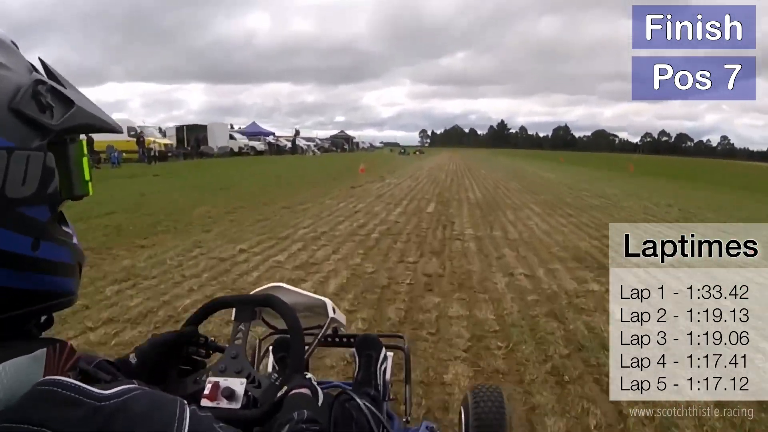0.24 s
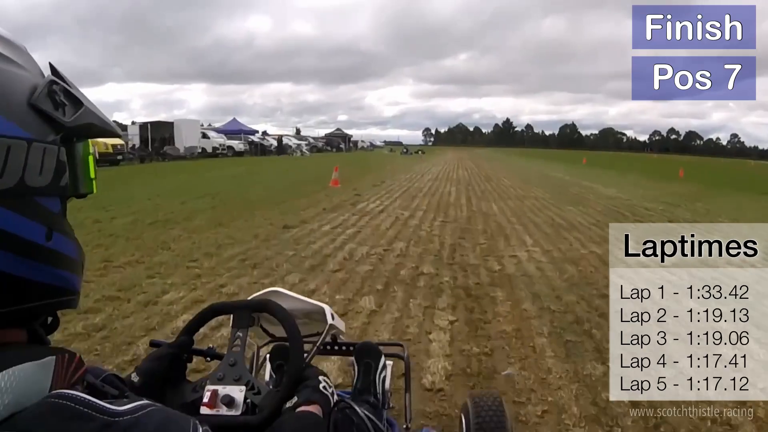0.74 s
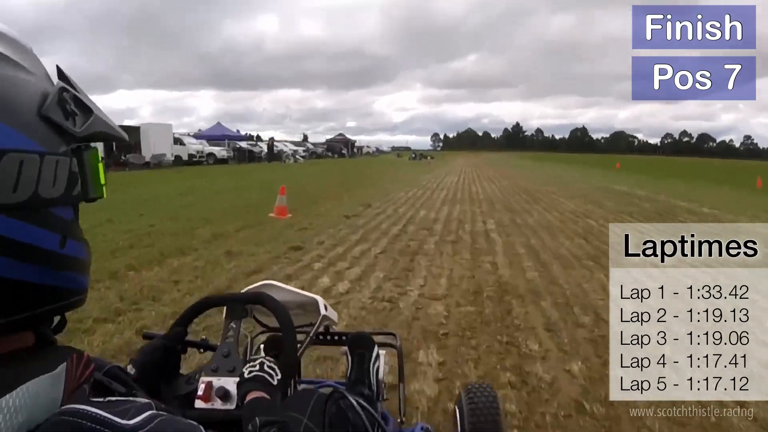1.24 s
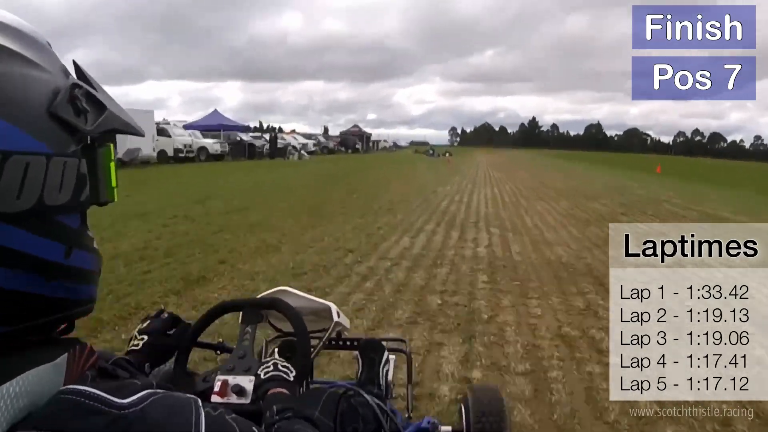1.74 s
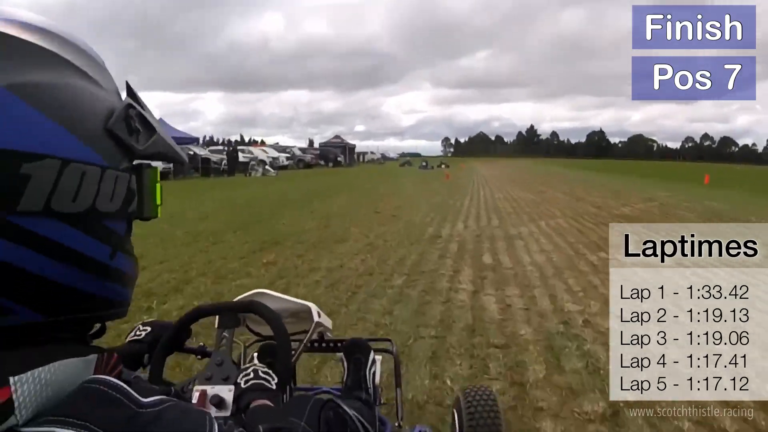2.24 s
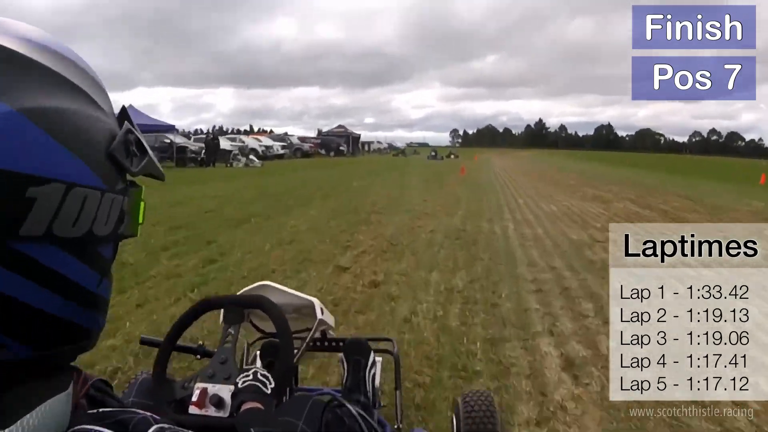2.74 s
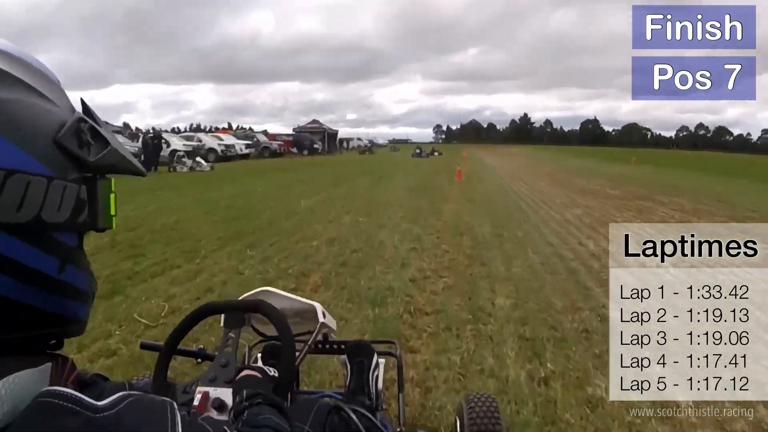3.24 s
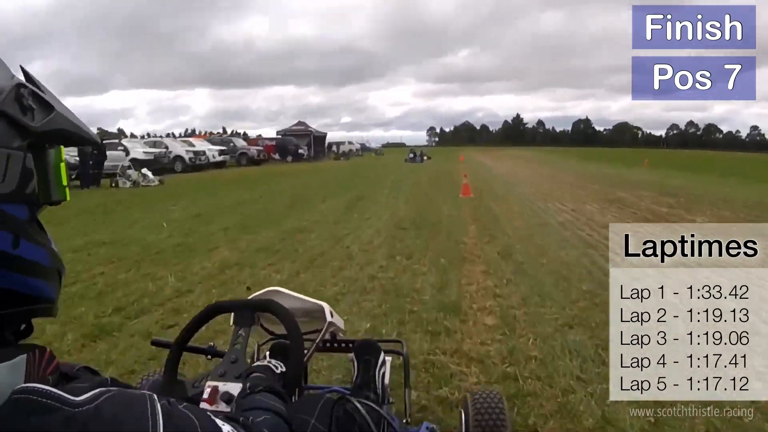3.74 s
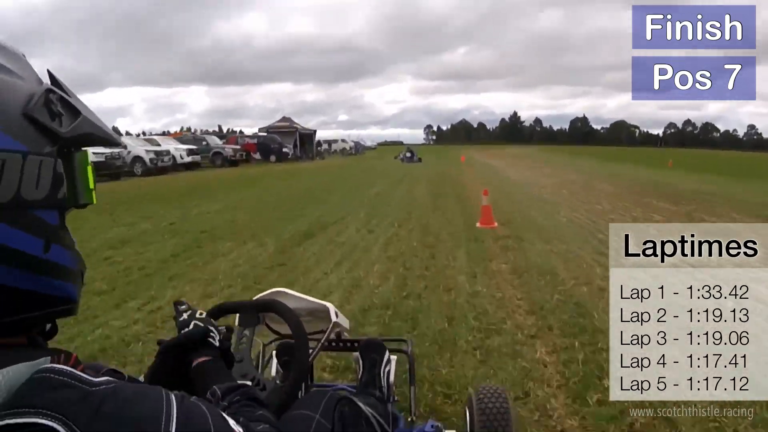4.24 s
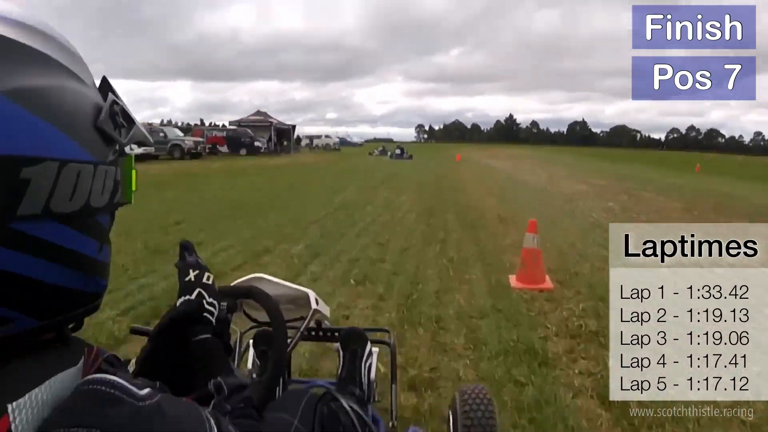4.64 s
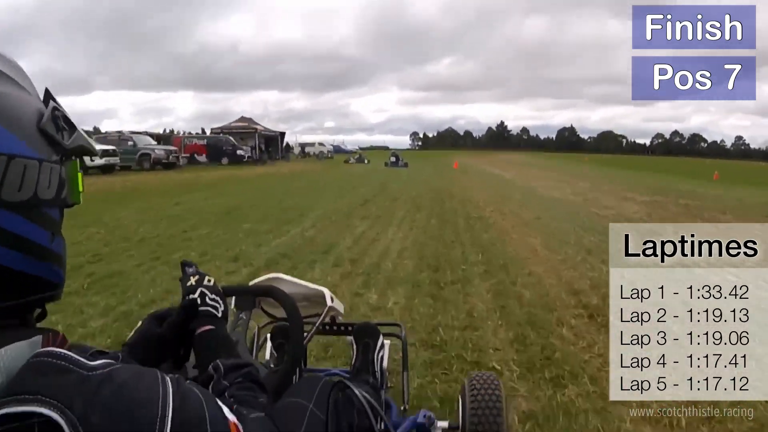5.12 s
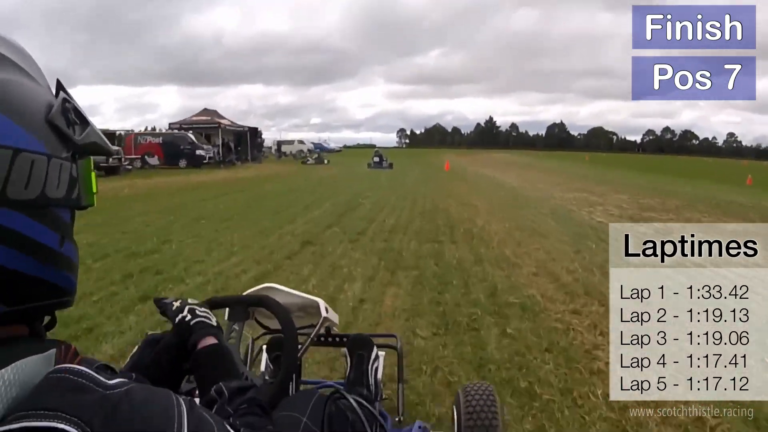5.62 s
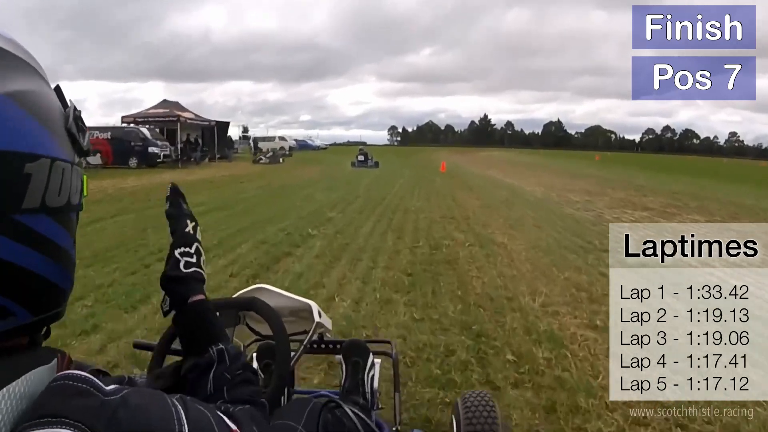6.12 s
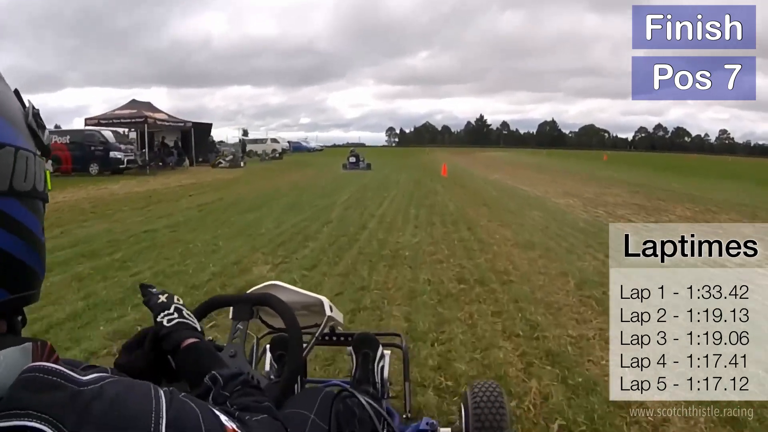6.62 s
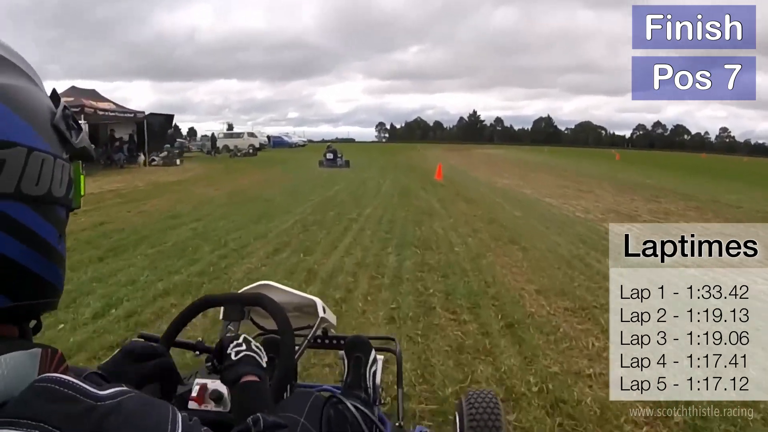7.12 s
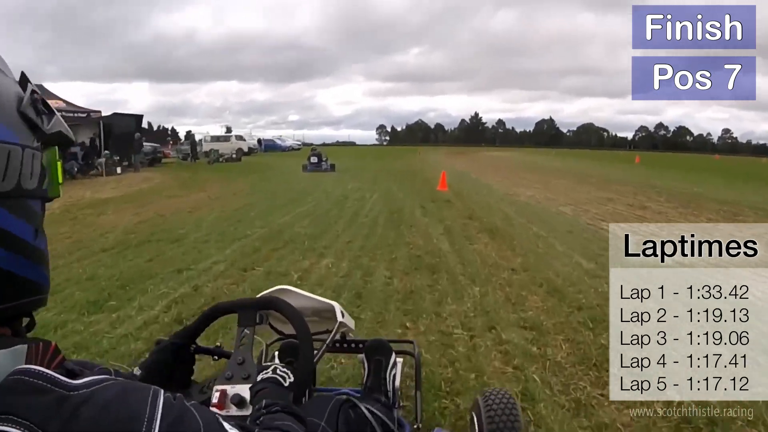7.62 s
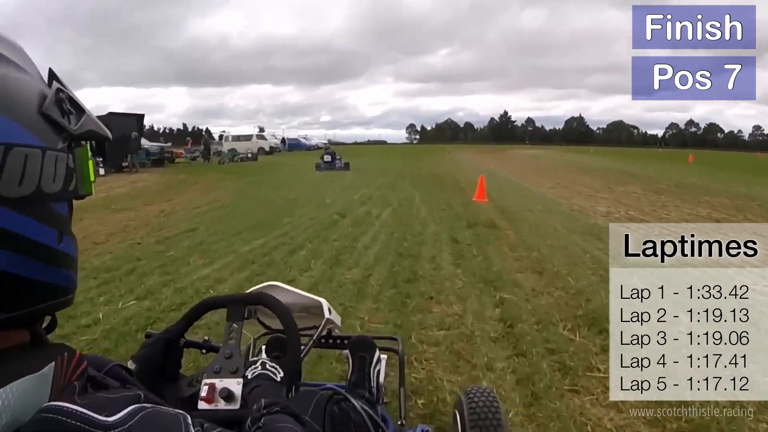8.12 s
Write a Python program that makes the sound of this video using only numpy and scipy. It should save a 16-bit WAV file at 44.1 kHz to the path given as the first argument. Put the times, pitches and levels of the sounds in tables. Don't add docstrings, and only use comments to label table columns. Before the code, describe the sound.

A small four-stroke kart engine throbs low over grass, with rough frame roar and metallic ticking, then eases off into uneven rumbling and rattling.

```python
import sys
import numpy as np
from scipy import signal
from scipy.fft import rfft, irfft, next_fast_len
from scipy.io import wavfile
from scipy.ndimage import uniform_filter1d, map_coordinates

SR = 44100
rng = np.random.default_rng(int(sys.argv[2]) if len(sys.argv) > 2 else 0)


def undo_db(level):
    steps = np.asarray(level, float) / 20
    return 10 ** steps


def output_pcm(signal):
    pcm = np.clip(np.atleast_2d(signal).T, -1, 1) * 32767
    wavfile.write(sys.argv[1], SR, np.round(pcm).astype(np.int16))


N = 369072

# (time [s], firing rate [Hz], crank hum [dB])
REVS = [(0, 46.95, -25.5), (.14, 43.93, -27), (.45, 44.16, -24.5), (1.33, 42.08, -24.5), (1.72, 41.33, -24),
        (1.84, 39.54, -23.5), (2.19, 40.47, -22.5), (2.33, 50.38, -26.5), (2.52, 47.42, -25.5),
        (2.7, 48.65, -24.5), (2.82, 44.65, -25.5), (3.3, 45.33, -24.5), (3.68, 42.55, -28.5),
        (4.05, 42.8, -23.5), (4.61, 40.5, -22.5), (5.5, 37.89, -22.5), (6.25, 35.7, -31.5),
        (8.37, 34.54, -42)]
# (time [s], throttle stage [0 pulling, 1 easing off, 2 coasting])
THROTTLE = [
    (5.6, 0),
    (6.05, 1),
    (6.72, 1),
    (7, 2),
]
# (time [s], firing rate change [Hz], half length [s])
LURCHES = [(.43, 1, 0.031), (.55, -1, 0.043), (.66, 1, .025), (1.28, -0.57, 0.055), (1.4, 0.77, 0.0405),
           (1.58, -1, 0.051), (1.72, 0.82, 0.039), (2.41, 2.5, 0.034), (2.74, 0.83, .025),
           (3.17, -1.26, .06), (3.31, 1.71, 0.034), (3.45, -0.82, 0.049), (3.58, 0.58, .025),
           (3.72, 0.54, 0.031), (3.9, -0.57, 0.055), (4.22, -1.25, 0.046), (4.4, -.5, .05),
           (5.28, -0.67, .04), (5.52, 0.48, .04), (5.8, -0.65, 0.031)]
# (time [s], change [dB], half length [s])
HUM_FALTERS = [(.07, -1, 0.0081), (.32, -6.5, 0.017), (.45, -9, 0.026), (.66, -8.5, .02),
               (.93, -1.5, 0.013), (1.63, 2, 0.059), (1.77, -0.5, .03), (2.02, 1.5, 0.02),
               (2.25, -11.5, 0.014), (2.4, -5, 0.012), (2.45, -3.5, .012), (2.73, -4, .01), (2.9, -6, 0.02),
               (3, -11, 0.013), (3.17, -7, 0.015), (3.33, -9, 0.017), (3.58, -1, .03), (3.69, 5, 0.022),
               (3.78, 1.5, .025), (4.07, -5, 0.029), (4.33, -2, 0.018), (4.44, -1.5, 0.027),
               (4.83, -2, .02), (5.14, -3.5, .025), (5.28, -3.5, 0.036), (5.66, -1.5, .02),
               (5.8, -3.5, 0.041), (5.86, 7, .015), (5.955, 5.5, 0.028), (6.04, 2, .02), (6.09, 2, .015)]
# (multiple of firing rate, pulling [dB], easing off [dB], coasting [dB])
EXHAUST_NOTE = [(1, -50, -54, -52), (3, -46, -44, -39), (4, -41, -40, -43), (5, -49, -45, -41),
                (6, -44, -44, -47), (7, -49, -53, -48), (8, -50, -53, -51), (9, -58, -57, -50),
                (10, -54, -60, -60), (11, -57, -58, -59), (12, -54, -57, -51), (13, -58, -58, -58),
                (14, -56, -58, -56)]
# (time [s], change [dB], half length [s])
CHOKES = [(.15, -6, 0.11), (1.95, -5.5, .04), (2.36, -16, .04), (2.9, -5.5, 0.046), (3.23, -14, .035),
          (3.35, 3, .04), (3.46, -7, .025), (3.55, 4, .035), (3.84, 3.5, 0.026), (4.01, 3.5, .035),
          (3.63, -13, 0.023), (3.76, -13, 0.022), (3.94, -5.5, 0.026), (4.09, -8, .022), (5.1, -3, 0.18),
          (5.78, -9, 0.077)]
# (time [s], level [dB])
SHAKE = [(0, 1), (.4, 0.5), (1.15, 0.5), (1.5, -1), (2.1, -1), (2.6, -1), (3.1, -2), (3.9, 0), (4.4, -2.5),
         (4.95, -2.5), (5.4, -3), (5.75, -6.5), (5.95, -4), (6.3, -3.5), (6.9, -1.5), (7.5, -1), (8.37, .5)]
# (time [s], change [dB], half length [s])
PATCHES = [(.08, 2.5, 0.025), (.2, -0.5, 0.027), (.42, 1, 0.1), (1.23, -2, 0.014), (1.3, 2, 0.016),
           (2.13, -2, .02), (2.205, 6, 0.014), (2.43, 6.5, 0.069), (2.58, -0.5, 0.034), (2.69, 4.5, .012),
           (2.75, 5, 0.029), (2.81, -4.5, 0.012), (2.95, 2.5, 0.057), (3.36, 4.5, .03), (3.44, 0, .015),
           (3.52, 2.5, 0.037), (3.83, 1, 0.026), (4.05, 1.5, .04), (4.12, -1, .015), (5.06, 1.5, 0.024),
           (5.2, 0.5, .02), (5.28, -4.5, 0.028), (6.4, 4, 0.016), (6.59, 0.5, 0.039), (7.47, 2, .03)]
# (time [s], rumble lift [dB], half length [s])
HEAVES = [(.28, 0, .04), (1.2, 5, .12), (1.85, 9.5, .08), (2.13, 9, .04), (2.31, 11, .04), (2.68, 6, .03),
          (2.92, 10.5, .1), (3.39, 12, .05), (3.7, 6, .04), (3.82, 8, .05), (4.18, 7, .04), (4.48, 4, .03),
          (4.85, 2.5, .06), (5.5, 3, .04), (5.7, 8, .06), (5.88, 11.5, 0.041), (6.65, 6.5, .15),
          (7.1, 6, .1), (7.55, 9, .1), (7.95, 8, .1), (8.2, 9, .07)]
# (time [s], swing [Hz], peak [dB], half length [s])
BUMPS = [(6.19, 73.1, -27.5, 0.024), (6.254, 72.87, -24.5, 0.024), (6.398, 71.84, -28.5, 0.045),
         (6.489, 73.2, -37, 0.018), (6.567, 72.3, -27.5, 0.021), (6.637, 72.1, -31.5, 0.04),
         (6.731, 79.07, -28, 0.017), (6.92, 79.97, -25.5, 0.056), (6.991, 78, -25, 0.031),
         (7.083, 78.1, -32, 0.019), (7.2, 84.6, -26, 0.058), (7.387, 89.5, -23.5, 0.026),
         (7.456, 89, -32.5, 0.026), (7.598, 84.3, -31, 0.043), (7.711, 80.1, -21, 0.031),
         (7.904, 79.1, -23, 0.015), (7.982, 83.5, -16.5, 0.011), (8.084, 84.9, -24, 0.033),
         (8.185, 80, -26.5, .025), (8.266, 79, -22.5, 0.026), (8.37, 78, -23.5, .02)]
# (time [s], slap lift [dB], half length [s])
SMACKS = [(.05, 10, 0.0087), (.1, 17, .01), (.4, 14, .01), (1.3, 11, .012), (1.375, 5, 0.0072),
          (1.68, 3, .01), (1.8, 8, 0.0077), (1.93, 5.5, 0.025), (2.19, 9, 0.013), (3.97, 7, 0.0094),
          (4.65, 2, 0.031), (4.91, 4, .012), (4.78, 5, .012), (4.96, 0, .012), (5.06, 5, .01),
          (5.15, 4, .008), (5.21, 9, 0.013), (5.39, 4, 0.049), (5.85, 4, .012), (5.93, 9, 0.017)]
# (time [s], peak [dB])
TICKS = [(0.0498, -46), (0.1044, -46), (0.336, -38), (0.3984, -40), (0.4519, -45), (0.8647, -45),
         (1.1058, -44), (1.3044, -41), (1.4849, -43), (1.8127, -44), (1.895, -44), (2.116, -42),
         (2.197, -39), (2.4851, -38), (2.7286, -46), (3.3507, -43), (3.469, -42), (3.5138, -43),
         (3.8614, -47), (3.9673, -41), (4.6557, -44), (4.7066, -44), (4.9075, -41), (5.01, -41),
         (5.0598, -43), (5.188, -46), (5.211, -44), (5.3447, -39), (5.423, -46), (5.8397, -48),
         (5.8969, -46), (5.962, -46), (6.1468, -46), (6.2532, -50), (6.5065, -40), (6.5479, -43),
         (6.6038, -43.5), (6.6463, -48), (6.6811, -51), (6.7022, -46), (6.8028, -42), (6.9021, -39),
         (6.9535, -43), (6.985, -46), (7.004, -41), (7.0583, -46), (7.0716, -38), (7.2748, -46),
         (7.3266, -46), (7.425, -42), (7.4364, -42), (7.572, -36), (7.6285, -41), (7.7712, -42),
         (7.847, -44), (7.9603, -36.5), (8.0041, -51), (8.1483, -46), (8.263, -40), (8.3229, -48)]
# (time [s], peak [dB], ring [Hz])
THUDS = [(.085, -20, 465), (.187, -21, 580), (.247, -25, 447), (.29, -22, 538), (.829, -23, 460),
         (.887, -23, 614), (1.074, -24, 420), (1.246, -27, 549), (1.341, -18, 420), (1.464, -28, 404),
         (1.776, -28, 406), (1.849, -23, 471), (1.991, -27, 484), (2.204, -13.5, 384), (2.22, -15, 620),
         (2.469, -23, 380), (2.65, -25, 511), (2.786, -27, 506), (3.165, -22, 495), (3.32, -24, 445),
         (4.301, -24, 555), (4.371, -24, 445), (4.422, -19.5, 470), (4.721, -18.5, 557), (4.884, -23, 563),
         (5.022, -21, 557), (5.06, -20, 520), (5.087, -21, 420), (5.189, -25, 393), (5.215, -23, 410),
         (5.24, -25, 500), (5.396, -22.5, 484), (5.46, -20.5, 398), (5.475, -24.5, 900),
         (5.582, -22.5, 600), (5.851, -27, 592), (5.893, -23.5, 595), (5.933, -23, 401), (7.629, -24, 374),
         (7.833, -24, 468), (7.985, -26, 700), (8.307, -21, 409)]
# (time [s], peak [dB], ring [Hz])
BRACKET_HITS = [(6.443, -33, 1550), (6.5058, -30, 1358), (6.5338, -32, 1349), (6.8022, -25, 1316),
                (6.8368, -32, 1490), (6.9274, -29, 1379), (6.9894, -30, 1390), (7.0451, -27, 1332),
                (7.2642, -31, 1380), (7.344, -31, 1280), (7.4382, -30, 1200), (7.54, -31, 1300),
                (7.6438, -29, 1280), (7.6722, -28, 1320), (7.712, -28, 1351), (7.7445, -27, 1290),
                (7.8563, -31, 1390), (8.2849, -34, 1360)]
# (frequency [Hz], width [Hz], level [dB])
PART_MODES = [
    (5280, 223, 4),
    (6500, 900, -9),
    (7180, 500, -10),
]
# (frequency [Hz], width [Hz], lift [dB])
PANELS = [(417, 110, 3), (644, 25, 4.5), (1198, 31, 5), (1333, 34, 4.5), (1660, 83, 5), (1835, 50, 8),
          (2120, 78, 2.5), (2830, 200, 4), (5230, 200, 1.5)]
# (time [s], half length [s], frequency [Hz], half width [Hz], change [dB])
WAKES = [(0.33, 0.22, 133, 8.8, -7), (2.93, .16, 136, 9.9, 8), (2.45, .15, 130, 9, -5),
         (5.65, 0.17, 111, 7, 7), (.6, 0.46, 174, 9, -2), (2.07, 0.11, 245, 22, -6.5),
         (7.4, .8, 5220, 250, 2), (7.6, 0.11, 255, 20, 4), (6.5, 0.17, 145, 12, 3), (1.8, .2, 545, 35, 6),
         (4.99, 0.18, 553, 23, 7), (.9, 0.24, 1195, 30, 2), (2.7, 0.39, 1370, 30, 4),
         (7.4, 0.45, 1310, 40, 2), (5.5, .25, 1478, 61, -3.5), (3.8, .4, 1480, 76, -3),
         (0.43, .3, 1690, 30, 0.5), (4.75, 0.24, 1685, 30, 7.5), (0.77, 0.34, 1840, 30, 2),
         (2.5, .35, 1840, 30, -2), (7.2, 0.97, 1840, 30, 1.5), (4.8, 0.28, 2120, 45, 7.5),
         (1.6, .12, 2500, 43, 2), (7.5, .7, 2110, 40, 2), (1.2, 0.96, 2240, 54, 2),
         (6.8, .35, 2420, 160, -8), (8.3, .6, 2390, 50, -6), (.8, .5, 2790, 40, 5.5),
         (0.64, 0.38, 2950, 40, 5.5), (2.45, .12, 4700, 66, 3), (7.8, 0.43, 2740, 50, 8),
         (7.8, .3, 2950, 50, 3), (.37, .12, 4300, 500, 5), (2.62, 0.15, 193, 14, 1),
         (5.2, 0.67, 1845, 25, 2.5), (.3, 0.16, 820, 79, 2), (7.8, .15, 195, 22.4, 3),
         (6.35, 0.24, 215, 10, 3), (6.25, .12, 5200, 250, 6), (6.7, 0.19, 320, 70, 3)]
# (frequency [Hz], density [dB per Hz])
RUMBLE = [(10, -40.5), (20, -16.5), (31, -12), (41, -3), (54, -10), (90, -3), (130, -21.5), (300, -120)]
# (frequency [Hz], density [dB per Hz])
ROAR = [(30, -58), (70, 4), (120, -3), (180, -3), (330, -7), (460, -4.5), (800, -6.5), (1460, -11.5),
        (1600, -24), (2080, -47.5), (3500, -120)]
# (frequency [Hz], density [dB per Hz])
COAST = [(150, -120), (300, -13.5), (430, 1.5), (800, -20.5), (1100, -7.5), (1370, 0.5), (1600, -1.5),
         (1830, -13.5), (2100, -30), (3000, -120)]
# (frequency [Hz], density [dB per Hz])
BUZZ = [(900, -26), (1500, 1.5), (1850, 1.5), (2000, -0.5), (2350, -7.5), (2750, -10.5), (3100, -11),
        (3500, -26), (4200, -26), (6000, -61), (9000, -120)]
# (frequency [Hz], density [dB per Hz])
RATTLE = [(2000, -36.5), (3400, -4), (4500, -5), (4900, -1.5), (5230, 1), (5700, -8), (6300, -9),
          (7300, -16.5), (8700, -21.5), (10000, -28), (10800, -48), (12000, -120)]
# (frequency [Hz], density [dB per Hz])
SLAP = [(500, -29.5), (2500, 6.5), (4000, -4), (5400, 2), (7500, -7), (10000, -20), (11000, -35.5),
        (12000, -120)]
# (frequency [Hz], density [dB per Hz])
HISS = [(5000, -40.5), (7000, -2), (8000, 0), (9000, -4.5), (10000, -12.5), (10800, -29.5), (12000, -120)]


def unit(x):
    return x / np.sqrt(np.mean(x ** 2) + 1e-20)


def noise():
    return rng.standard_normal(N)


def curves(rows):
    s, *cols = np.transpose(rows)
    return [np.interp(np.arange(N) / SR, s, c) for c in cols]


def swells(rows):
    s, height, half = np.transpose(rows)[:, :, None]
    t = np.arange(0, N + 64, 64) / SR
    bells = height * np.exp(-.5 * ((t - s) / half) ** 2)
    return np.interp(np.arange(N) / SR, t, np.sum(bells, axis=0))


def wobble(rate):
    coarse = np.arange(0, N + 64, 64)
    knots = rng.standard_normal(int(N * rate / SR) + 4)
    return np.interp(np.arange(N), coarse, map_coordinates(knots, [coarse * rate / SR]))


def filtered(x, response):
    m = next_fast_len(N + 8192)
    return irfft(rfft(x, m) * response(np.fft.rfftfreq(m, 1 / SR)), m)[:N]


def resonance(f, centre_hz, width_hz):
    return 1j * f * width_hz / (centre_hz ** 2 - f * f + 1j * f * width_hz)


def coloured(x, spectrum):
    f, v = np.transpose(spectrum)

    def response(hz):
        panel_db = sum(db / (1 + (2 * (hz - c) / w) ** 2) for c, w, db in PANELS)
        return undo_db(np.interp(np.log(hz + 1), np.log(f), v) + panel_db)

    return unit(filtered(x, response))


def beaten(turns, sharp, scatter_db, share):
    luck = np.clip(rng.standard_normal(int(turns[-1]) + 2), -2, 2)
    size = undo_db(scatter_db * luck)[turns.astype(int)]
    phase = turns % 1
    burst = unit(size * np.exp(-sharp * phase) * (1 - np.exp(-5 * sharp * phase)) * noise())
    share = np.clip(share, 0, 1)
    return np.sqrt(share) * burst + np.sqrt(1 - share) * noise()


def shaken(shake_feel, patch_feel):
    return shake_feel * curves(SHAKE)[0] + patch_feel * swells(PATCHES)


def hum_level():
    return curves(REVS)[1] + swells(HUM_FALTERS)


def microphone_hiss():
    return undo_db(-80.5) * coloured(noise(), HISS)


def mount():
    s, hz, db, half = np.transpose(BUMPS)
    swing_hz, = curves(np.transpose([s, hz]))
    size = swells(np.transpose([s, undo_db(db), half]))
    swing = np.sqrt(2) * np.sin(2 * np.pi * np.cumsum(swing_hz) / SR + 0.38 * wobble(22))
    shake = unit(filtered(noise(), lambda f: resonance(f, 84, 30) ** 2))
    rumble = undo_db(-43 + swells(HEAVES)) * coloured(noise(), RUMBLE)
    return undo_db(-4.0) * size * swing + undo_db(-11.5) * uniform_filter1d(size, size=12000) * shake + rumble


def loose_part():
    scrapes, t = np.zeros(N + SR), np.arange(SR // 20) / SR
    click_share = .45
    held_db = -5.5
    at, luck = rng.random((round(3 * N / SR), 2)).T
    faint = zip(at * N / SR, -51 + 2 * (2 * luck - 1))
    for s, db in [*TICKS, *faint]:
        level = undo_db(db + held_db * (s < THROTTLE[0][0]))
        scrape = undo_db(-60 * t / 0.019) * (1 - np.exp(-t / 0.00049)) * rng.standard_normal(len(t))
        scrape = scrape / np.linalg.norm(scrape)
        scrapes[round(s * SR):][:len(t)] += level * scrape * np.sqrt(1 - click_share)
        scrapes[round(s * SR) + 20] += level * np.sqrt(click_share)

    def response(f):
        modes = sum((-1) ** k * undo_db(db) * resonance(f, c, w) for k, (c, w, db) in enumerate(PART_MODES))
        too_small_for_lows = (1j * f / 4300) ** 2 / (1 + 1j * f / 4300) ** 2
        return modes * too_small_for_lows / (1 + (f / 7600) ** 8)

    return undo_db(33.5) * filtered(scrapes[:N], response)


def jolts():
    out, t = np.zeros(N + SR), np.arange(SR // 20) / SR
    for s, db, hz in THUDS + BRACKET_HITS:
        onset = 1 - np.exp(-(t / 0.0005) ** 2)
        out[round(s * SR):][:len(t)] += undo_db(db - 60 * t / 0.017) * np.sin(2 * np.pi * hz * t) * onset
    return out[:N]


def rattle(firings):
    hiss = coloured(beaten(2 * firings, sharp=1.9, scatter_db=4.0, share=0.49), RATTLE)
    slaps = coloured(beaten(4 * firings + .2, sharp=11.0, scatter_db=4.0, share=1), SLAP)
    hum_shake_db = 1.8 * (uniform_filter1d(hum_level(), size=2000) + 24.5)
    slap_db = -64.5 + hum_shake_db + swells(SMACKS) + wobble(16)
    hiss_db = -59 + shaken(1.76, 1.08) + 0.39 * curves(THROTTLE)[0] + 0.5 * wobble(22)
    return undo_db(hiss_db) * hiss + undo_db(slap_db) * slaps


def frame(firings):
    coasting = 0.075 * curves(THROTTLE)[0]
    ground = wobble(20)
    firm = np.clip(1 + 0.31 * (hum_level() + 23), 0.55, 1.6)
    roar = coloured(beaten(2 * firings, sharp=3.16, scatter_db=2, share=0.5 * firm), ROAR)
    ringing = coloured(beaten(firings, sharp=3.2, scatter_db=3, share=0.36), COAST)
    buzz = coloured(beaten(2 * firings - .05, sharp=2.9, scatter_db=3.0, share=0.56 * firm), BUZZ)
    panel_knocks = beaten(2 * firings, sharp=1.5, scatter_db=2.5, share=0.9)
    sing = unit(filtered(panel_knocks, lambda f: resonance(f, 1726, 220) ** 2))
    sing_db = -52 + 1.4 * (curves(REVS)[0] - 48) + 2.2 * swells(PATCHES)
    body = np.sqrt(1 - coasting) * roar + np.sqrt(coasting) * ringing
    roar_db = -34.5 + shaken(0.98, 0.54) + 0.38 * ground
    buzz_db = -42.97 + shaken(0.92, 1.1) + 0.35 * ground
    return undo_db(roar_db) * body + undo_db(buzz_db) * buzz + undo_db(sing_db) * sing


def engine(firings):
    stage, = curves(THROTTLE)
    hum = undo_db(hum_level() - 5.4 * np.minimum(stage, 1) + (0.68 + 1.4 * stage) * wobble(19))
    hum = hum * np.sin(2 * np.pi * (2 * firings + .3) + 0.2 * wobble(10))
    revved_db = 3.5 * np.exp(-.5 * ((curves(REVS)[0] - 47.7) / 2.85) ** 2)
    revved_db = uniform_filter1d(revved_db, size=7000) + swells(CHOKES)
    note = np.zeros(N)
    for k, *levels_db in EXHAUST_NOTE:
        level_db = np.interp(stage, np.arange(len(levels_db)), levels_db) + (k % 4 == 0) * revved_db
        level_db = level_db + 0.6 + (1.6 + 0.7 * stage) * wobble(9)
        phase = 2 * np.pi * k * firings + rng.uniform(0, 5.9) + 0.059 * k * wobble(7)
        note += undo_db(level_db) * np.sin(phase)
    return np.sqrt(2) * (hum + undo_db(-0.7 + shaken(0.63, 0.16)) * note)


def woken(x):
    hz, t, z = signal.stft(x, SR, nperseg=4096)
    s, half, centre_hz, width_hz, db = np.transpose(WAKES)[:, :, None]
    band = np.exp(-.5 * ((hz - centre_hz) / width_hz) ** 2)
    gain_db = band.T @ (db * np.exp(-.5 * ((t - s) / half) ** 2))
    return signal.istft(undo_db(gain_db) * z, SR, nperseg=4096)[1][:N]


def scene():
    firings = np.cumsum(curves(REVS)[0] + swells(LURCHES)) / SR
    kart = woken(engine(firings) + frame(firings) + rattle(firings))
    return (kart + mount() + loose_part() + jolts() + microphone_hiss())[None]


def thinned_treble(x):
    hz, _, z = signal.stft(x, SR, nperseg=2048)
    local = uniform_filter1d(uniform_filter1d(abs(z), size=41, axis=-2), size=3, axis=-1)
    gain_db = np.where(abs(z) < 1.25 * local, -11, 1.5) * (hz > 7500)[:, None]
    return signal.istft(undo_db(gain_db) * z, SR, nperseg=2048)[1][..., :N]


def roll_off(x):
    return signal.sosfilt(signal.butter(12, 11400, fs=SR, output="sos"), x)


def record(dry):
    mix = thinned_treble(dry)
    return roll_off(mix)


dry = scene()
out = record(dry)
output_pcm(out)
```